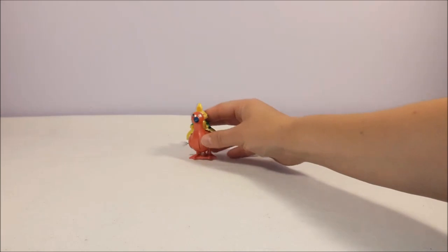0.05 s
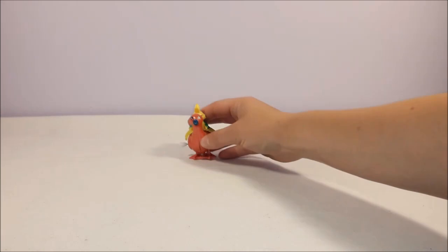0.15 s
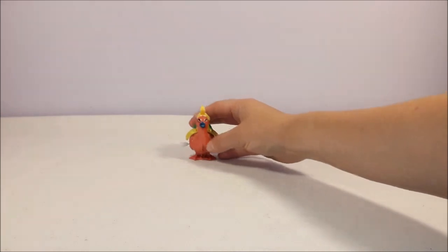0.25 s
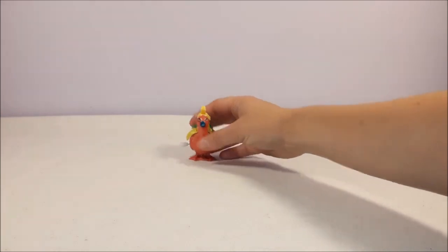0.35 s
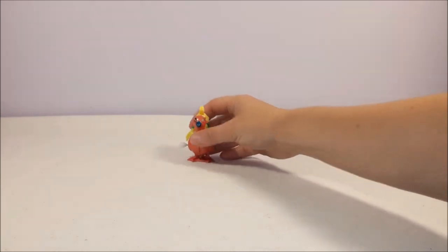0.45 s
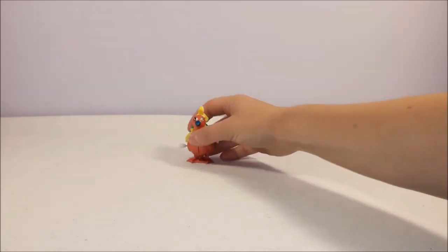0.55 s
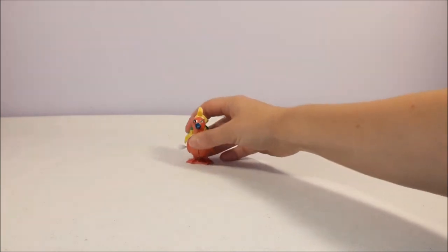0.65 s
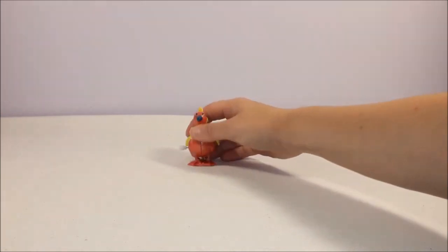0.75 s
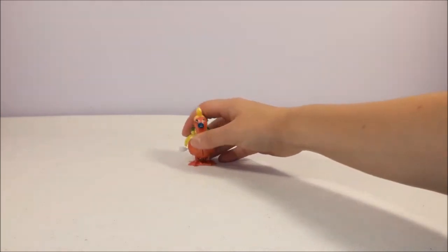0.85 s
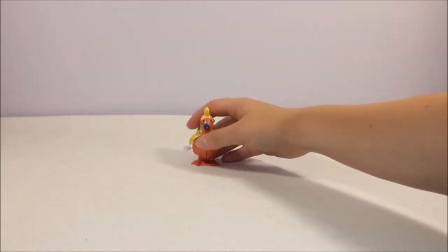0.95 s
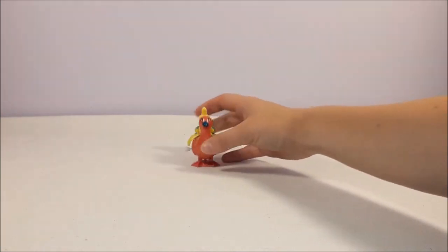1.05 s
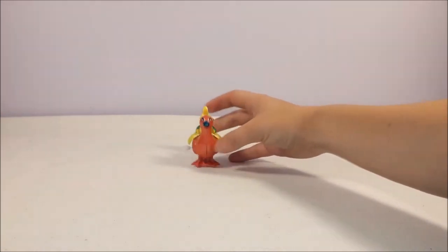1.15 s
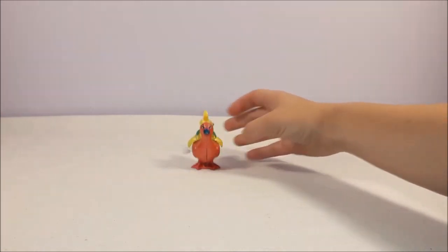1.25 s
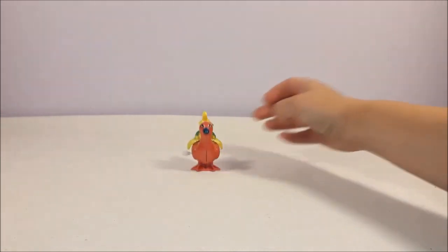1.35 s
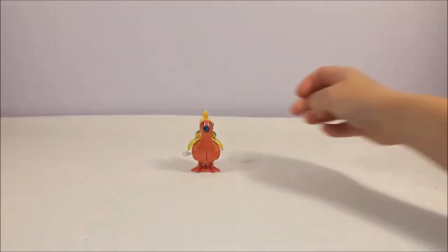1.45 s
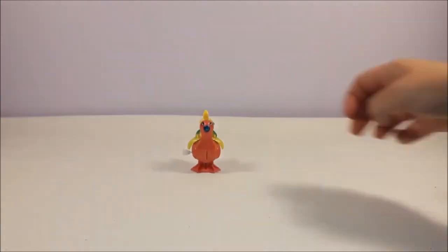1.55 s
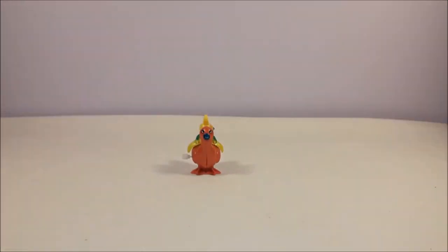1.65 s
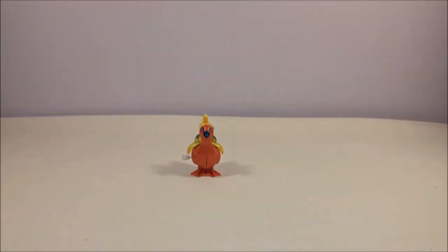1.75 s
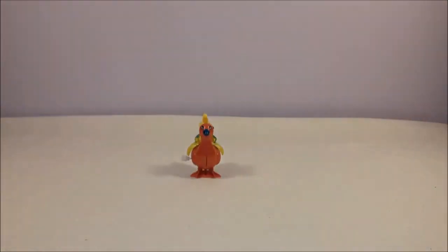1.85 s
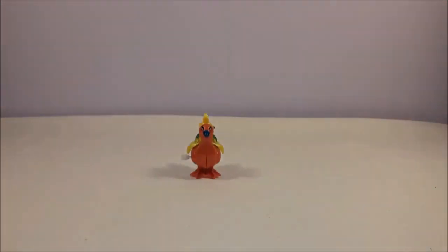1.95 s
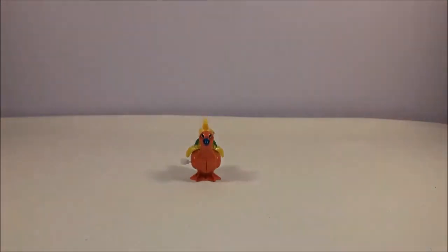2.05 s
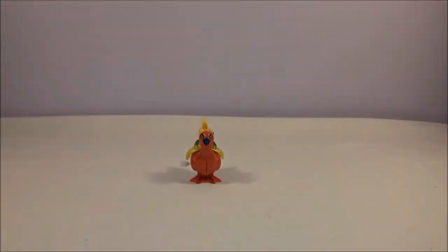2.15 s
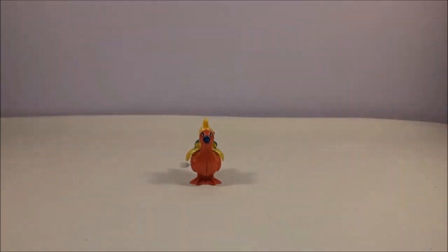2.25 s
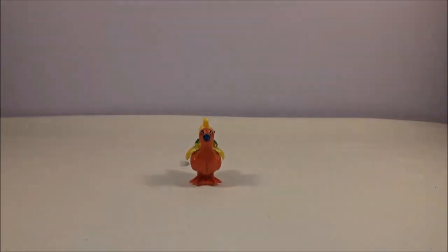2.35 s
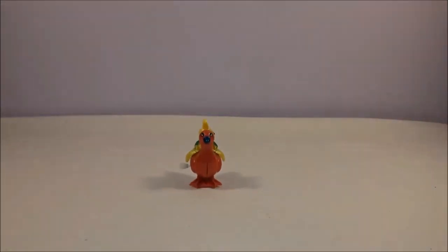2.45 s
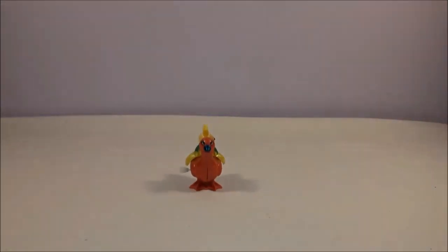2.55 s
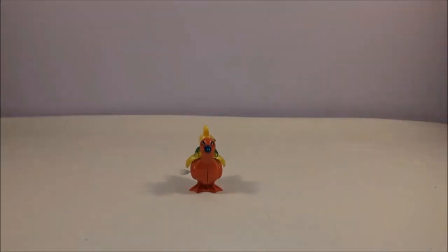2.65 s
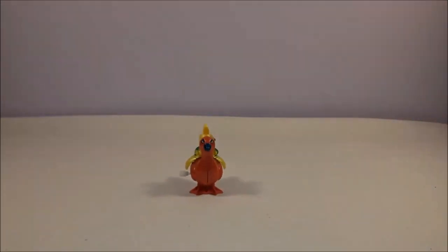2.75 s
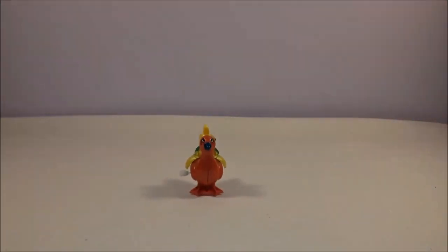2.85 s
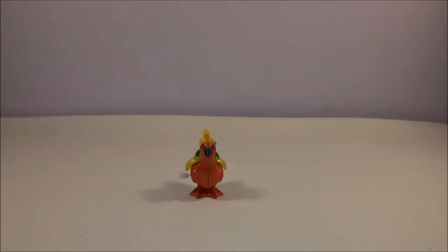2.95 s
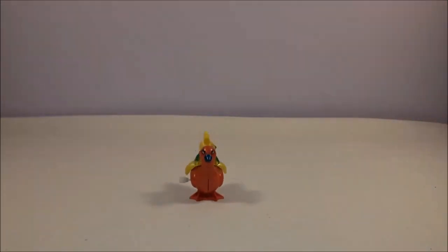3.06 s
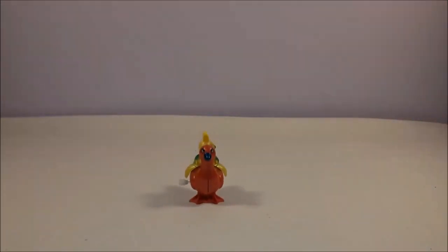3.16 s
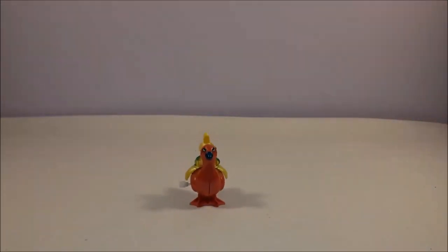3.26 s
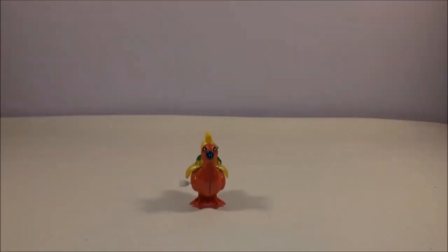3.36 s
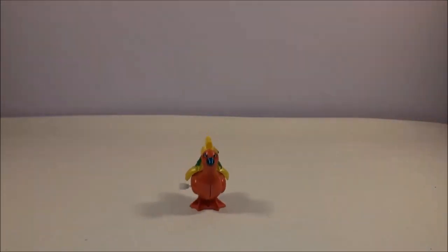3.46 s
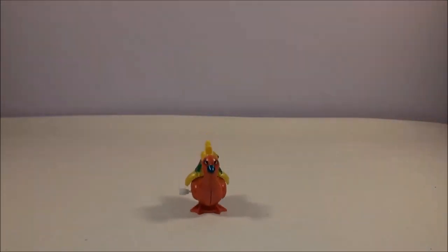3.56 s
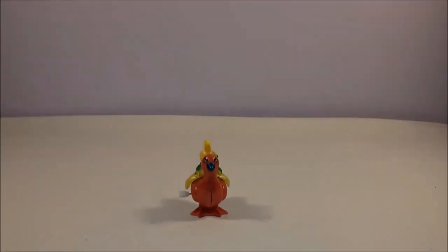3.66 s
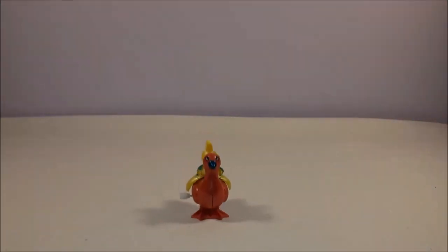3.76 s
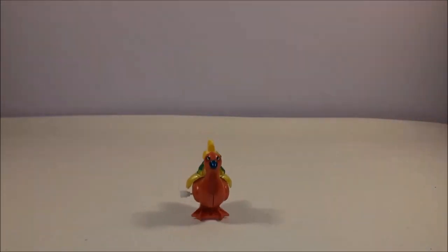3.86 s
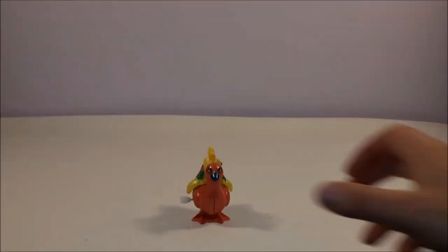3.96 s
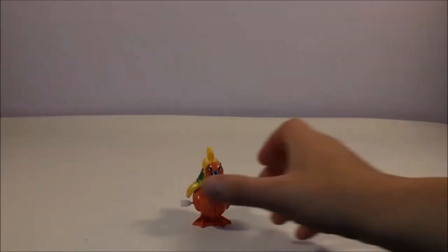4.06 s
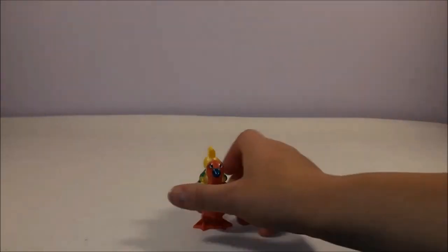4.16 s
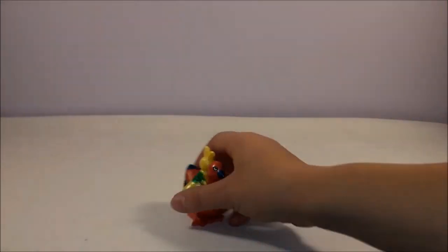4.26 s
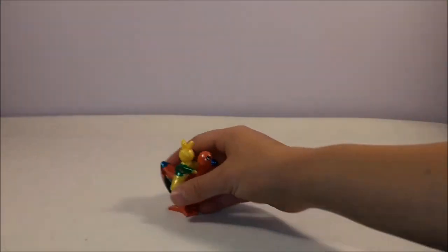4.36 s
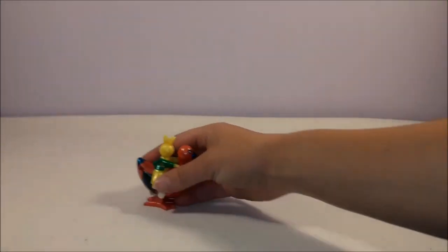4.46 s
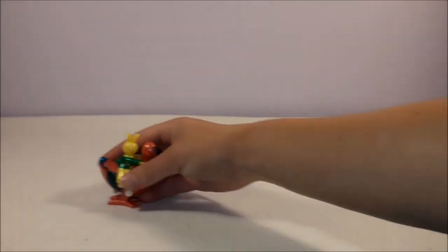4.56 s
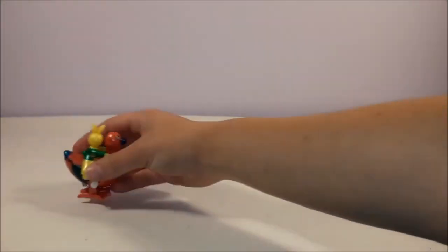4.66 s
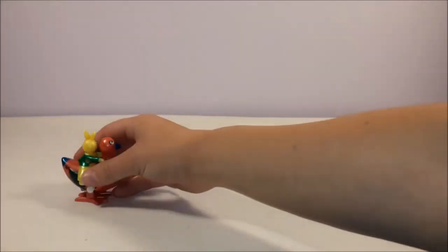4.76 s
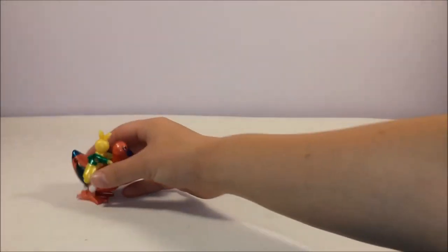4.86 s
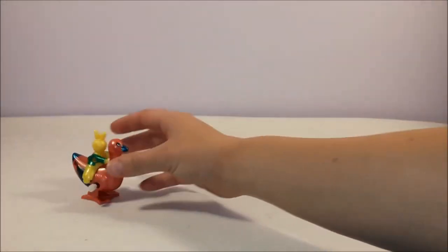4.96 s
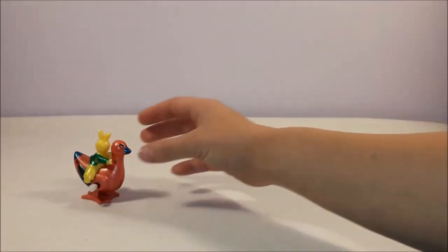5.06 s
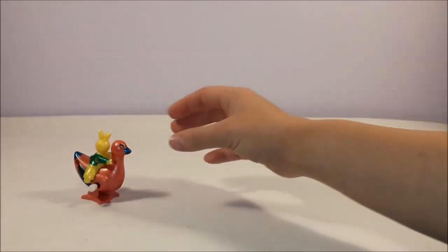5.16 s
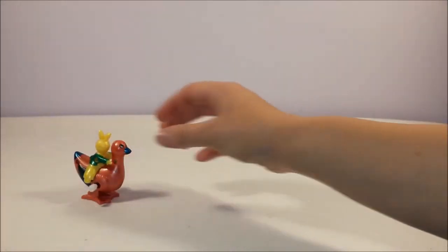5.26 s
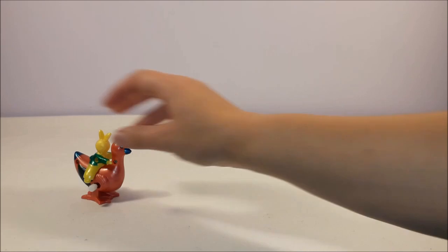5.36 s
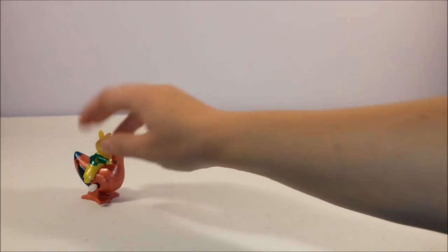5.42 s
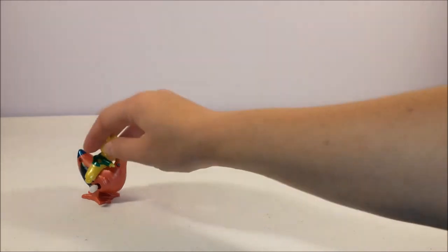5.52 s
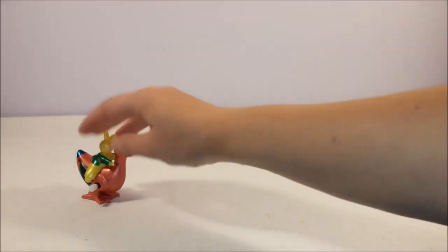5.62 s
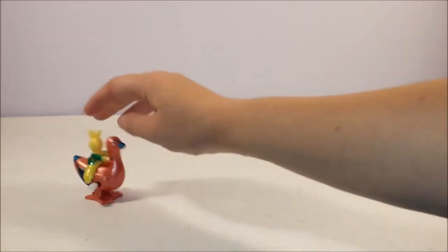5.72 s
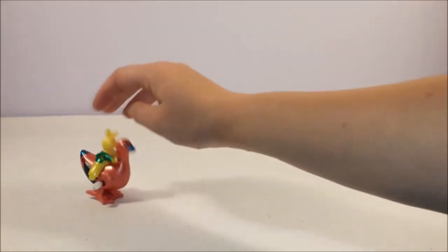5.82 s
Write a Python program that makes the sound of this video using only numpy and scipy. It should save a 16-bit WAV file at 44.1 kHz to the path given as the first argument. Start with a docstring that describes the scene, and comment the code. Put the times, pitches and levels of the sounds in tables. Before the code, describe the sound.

Fingers softly rub a small plastic wind-up toy, which is set down on a table with a sharp snap. Its gears then whir and rattle in quick even surges, about eight a second, with faint foot taps, until a hand grabs it. Clicks, knocks and brief gear bursts follow. Small room, close phone microphone, light hiss.

```python
"""Small room, a table top, a phone microphone close by: a plastic wind-up walker.
A hand fingers it (coloured grains), sets it down with a snap and lets go. The gear train rattles in one
surge per step (dense knocks ringing drifting shell modes) and the feet thud on the table (struck modes).
The hand catches it, turns it side-on, and the gears rattle on in a few short bursts.
Behind it lie microphone hiss and a low room rumble."""
import sys
import numpy as np
from scipy import signal
from scipy.fft import rfft, irfft
from scipy.io import wavfile
from scipy.ndimage import uniform_filter1d

SR = 44100
rng = np.random.default_rng(int(sys.argv[2]) if len(sys.argv) > 2 else 0)


def materialize(psi):
    """Save the field psi as 16-bit PCM at rate SR to the path in sys.argv[1].

    A 1-D psi becomes a single channel; in a 2-D psi each row is a channel.
    """
    bounded = np.clip(np.atleast_2d(psi).T, -1, 1)
    quanta = np.round(bounded * 32767).astype(np.int16)
    wavfile.write(sys.argv[1], SR, quanta)


N = 259738
TIME = np.arange(N) / SR

# Microphone hiss, spectrum shape: (f/Hz, level per Hz/dB)
HISS_COLOUR = [(88, -45), (150, -9.5), (293, -10), (356, -18.5), (409, -12), (934, -10.5), (1050, -12),
               (1230, -16), (15000, -22.5), (16500, -25)]
# Room rumble, spectrum shape: (f/Hz, level per Hz/dB)
RUMBLE_COLOUR = [(12, -42.5), (20, -18.5), (27, -14.5), (53, -2.5), (92, 0.5), (141, 1.5), (161, -8),
                 (190, -10), (352, -23), (437, -14), (500, -20.5), (650, -48), (1100, -120)]
# Room rumble over time: (t/s, level/dB)
RUMBLE_LEVEL = [(0, -76), (1.85, -78), (2.3, -75), (4.4, -74), (5.2, -78), (5.89, -74)]
# Decay of the room: (f/Hz, t60/s)
ROOM_DECAY = [(200, 0.23), (600, 0.51), (1600, 0.27), (3700, 0.26), (8000, 0.14), (13000, 0.18)]
# Microphone port: (f/Hz, gain/dB)
PORT = [(6000, -3.5), (7600, 2), (8200, -1), (8600, -7.5), (9800, -6.5), (11500, -5)]
# Modes of the table top: (f/Hz, width/Hz, level/dB)
TABLE_MODES = [(134.1, 25, -5), (231.5, 95, 3), (270, 60, -1), (455, 50, 0), (581.8, 55, 1),
               (710, 120, -3.5), (893, 450, 8), (1110, 67, -8)]
# Single thuds on the table top, handling, the set-down and a last footfall: (t/s, level/dB, hardness 0-1)
SINGLE_THUDS = [(.148, -70.5, .64), (.216, -68.5, .1), (.533, -66.5, .3), (.608, -68.5, .54),
                (.752, -35.5, .72), (.887, -61, .65), (4.238, -67, .5), (4.449, -72, .33), (4.782, -53, .4),
                (4.901, -66, .61), (4.995, -60, .6), (5.768, -66, .65)]
# Fingers rub shell and table: (start t/s, crest t/s, crest level/dB, climb/dB, 20 dB fall t/s,
# dull band relative level/dB)
RUBS = [(.06, .12, -70, 14, .08, -5), (.14, .16, -57, 14, .014, 12), (.17, .24, -67, 8, .12, 0),
        (.3, .456, -69, 6, .02, -9), (.456, .468, -56.5, 12, .2, 5), (.63, .644, -62, 10, .07, -5),
        (.68, .746, -48, 27, .004, 15), (4.334, 4.336, -51, 3, .05, 15), (4.35, 4.415, -53, 7, .22, -8),
        (4.42, 4.57, -58, 9, .055, 0), (4.71, 4.723, -75, 10, .3, -8)]
# Colour of the fine rustle, spectrum shape: (f/Hz, level per Hz/dB)
RUB_COLOUR = [(180, -53), (300, -16.5), (546, -14), (1010, -31), (1840, -9.5), (2740, -15), (3080, -10.5),
              (3950, -12), (5700, -6.5), (7080, -3), (8640, -19.5), (12500, -11.5), (16000, -11.5)]
# Loose parts tick: (t/s, peak level/dB, brightest f/Hz, sharpness Q)
LOOSE_TICKS = [(.1525, -50, 3900, 3), (.157, -45, 7400, 9), (.2468, -42.5, 7530, 12), (.368, -50, 7450, 9),
               (.401, -49, 7550, 5), (.468, -41, 7550, 6), (.4744, -43, 7530, 3), (.4905, -39, 3900, 1.6),
               (.6465, -39.5, 2180, 7), (1.0129, -45, 6240, 4), (3.2195, -22, 5070, 4.4),
               (3.8063, -17, 7800, 7), (4.2208, -18, 5400, 11), (4.2622, -25, 5300, 9),
               (4.2815, -25, 1800, 3.2), (4.33, -36, 3040, 10), (4.3744, -43, 6460, 3.6),
               (4.428, -41, 3030, 8), (4.5642, -40, 7200, 2.2), (4.7222, -58, 7150, 3.6),
               (4.7752, -26, 6750, 12), (4.953, -24, 1780, 5), (4.967, -25, 1780, 5),
               (5.049, -33, 1730, 3.2), (5.5335, -27, 6900, 5), (5.5525, -25, 7000, 4)]
# Set down on the table, and a bounce: (t/s, peak level/dB, brightest f/Hz)
SNAP = [(.7520, 0, 5300), (.7595, -7, 6500)]
# Broad colour of the shell: (f/Hz, level/dB)
SHELL_COLOUR = [(700, -50), (1150, -26.5), (1450, -14.5), (2300, -9), (4000, 0), (8200, 0.5), (11000, 3.5),
                (15500, 1.5), (20000, -10)]
# Shell modes over the broad colour: (f/Hz, width/Hz, facing level/dB, side-on level/dB)
SHELL_MODES = [(1778, 120, 15.5, 21), (1950, 120, 21.5, -39), (2613, 200, 16, 14.5), (3000, 200, 5, 12.5),
               (3600, 450, -4.5, 5.5), (4532, 220, 10.5, 1.5), (5060, 224, 12.5, 8), (5410, 240, 10, 11),
               (6400, 760, 4, 15), (7660, 300, 17, 13), (10550, 500, 1.5, -2), (11960, 800, 5.5, 7),
               (14310, 380, -8.5, 3)]
# One row a step: (tooth catch t/s, crest level/dB, shell ring level/dB, footfall level/dB)
STEPS = [(1.043, -25.5, -7, -90), (1.168, -28.5, -5, -90), (1.300, -27.8, 0, -90), (1.439, -29.5, -8, -90),
         (1.579, -28.5, -3, -90), (1.716, -29, -3, -90), (1.851, -26.5, -1, -90), (1.984, -26, -1, -90),
         (2.107, -26, 0, -80), (2.236, -24.5, -3, -80), (2.372, -25.5, -5, -64), (2.502, -26, -5, -77),
         (2.639, -25, 0, -60), (2.767, -25.5, -5, -70.5), (2.895, -25, -2, -66), (3.030, -24, 0, -61),
         (3.155, -24, 0, -63), (3.272, -23.5, -1, -66), (3.397, -23.5, -4, -63.5), (3.527, -23.5, -2, -68),
         (3.649, -24.5, -1, -68.5), (3.781, -25, -1, -60), (3.913, -23.5, -3, -62), (4.044, -23.5, 3, -80),
         (4.174, -26.5, -4, -71)]
# Cam, gear speed through a step with its crest near .45: (share of step, share of the way to the trough)
CAM = [(0, 1.1), (.08, .75), (.18, .48), (.29, .08), (.39, .15), (.48, 0), (.57, .19), (.7, .56), (.76, .6),
       (.83, .4), (.93, .85), (1, 1.1)]
# Short bursts of gear rattle, after the set-down and later in the hand:
# (start t/s, crest t/s, crest level/dB, climb/dB, 20 dB fall t/s, belly level/dB)
BURSTS = [(.756, .77, -29, 3, .085, 4), (.837, .84, -30, 4, .05, -8), (4.278, 4.28, -33.5, 6, .035, 14),
          (4.315, 4.319, -37, 10, .011, -6), (4.781, 4.787, -24.5, 6, .006, -3),
          (4.866, 4.89, -37, 10, .03, -4), (4.885, 4.911, -22.5, 17, .003, 0),
          (4.92, 4.957, -25.5, 17, .045, 2), (4.996, 5.0, -32, 8, .024, 13), (5.03, 5.052, -46, 5, .02, 8),
          (5.529, 5.542, -31, 12, .05, -26), (5.55, 5.557, -28, 5, .002, 0), (5.722, 5.747, -27, 8, .05, 3),
          (5.765, 5.776, -34, 6, .017, 12), (5.819, 5.823, -35, 6, .04, 0), (5.85, 5.886, -24, 19, .02, -6)]

HISS_DB, ROOM_DB = -75.5, -6.5
BASS_EDGE_HZ, TREBLE_EDGE_HZ = 60., 15780
FOOT_LEAD_S, FOOT_HARDNESS = .058, 0.  # the foot lands before the tooth catches
FOOT_HEARD_DB = -79  # softer footfalls stay silent

# pairs run from the first step to the last; levels are relative to 1 unless noted
CATCH_DB, CATCH_HZ, CATCH_SPREAD_DB = (-14, -2), 7700, 4.  # level against the step's crest
LEG_DB, LEG_SPREAD_DB = (-40, -33), 5.  # knock of a loose leg
LEG_HZ = (1760, 2020)  # lowest and highest knock
LEG_AFTER_S, LEG_SCATTER_S = (-.017, .028, .068), .006  # at lift, swing and drop, from the catch
GEAR_Q, SNAP_Q, SNAP_T60_S = 7., .7, .012
TICK_T60_S, TICK_SLOPE = .019, .4  # t60 at the catch pitch; lower ticks ring longer

WALK_START_S, WALK_END_S, CREST_LAG_S = 1.011, 4.275, .025  # the crest follows the catch
TROUGH_DB = (-28, -20.5)  # below the crest at full depth, start and end of the walk
BELLY_DB, BELLY_SWAY_DB = -1.5, 1.5  # lift of the lowest modes while walking, rms sway
RING_FADE_DB, HELD_RING_DB = -7., -9.  # loss of ring at full depth; ring damped by the fingers
BELLY_BELOW_HZ, LEG_MODES_BELOW_HZ, RING_BAND_HZ = 2300, 3400, (7200, 8200)


def gain_of(db):
    """Amplitude factor of a level in dB."""
    return 10 ** (np.asarray(db) / 20)


def evened(x):
    """Signal scaled to rms 1."""
    return x / np.sqrt(np.mean(x ** 2) + 1e-20)


def read(points, hz):
    """Value of a (f/Hz, value) table, straight between points over log frequency."""
    f, value = np.transpose(points)
    return np.interp(np.log(hz + 1), np.log(f + 1), value)


def coloured(x, points):
    """Causal filter with the given spectrum (minimum phase)."""
    level_db = np.maximum(read(points, abs(np.fft.fftfreq(4096, 1 / SR))), -100)
    log_gain = np.log(gain_of(level_db))
    taps = np.fft.ifft(np.exp(np.conj(signal.hilbert(log_gain)))).real[:2048]
    return signal.oaconvolve(x, taps)[:len(x)]


def resonate(x, hz, width):
    """One mode, fixed or drifting, gain 1 at its centre: shift to zero, smooth, shift back."""
    turn = np.exp(2j * np.pi * np.cumsum(hz * np.ones(len(x))) / SR)
    r = np.exp(-np.pi * width / SR)
    return 2 * (turn * signal.lfilter([1 - r], [1, -r], x * turn.conj())).real


def wander(count):
    """Slow chance, rms 1, smoothed twice over count samples."""
    return evened(uniform_filter1d(uniform_filter1d(rng.standard_normal(N), count), count))


def swell(start, crest, db, climb_db, fall):
    """Gain that sets in at once, climbs to its crest and dies away, at steady rates in dB."""
    climbing_db = climb_db * (crest - TIME) / (crest - start)
    falling_db = 20 * (TIME - crest) / fall
    return (TIME >= start) * gain_of(db - np.maximum(climbing_db, falling_db))


def contacts(per_s, spread_db, clump_db):
    """Dense random knocks of uneven size that come in clumps of a few milliseconds."""
    size = gain_of(spread_db * np.minimum(rng.exponential(1, N), 3)) * rng.standard_normal(N)
    struck = rng.random(N) < per_s / SR
    return evened(size * struck * gain_of(clump_db * wander(count=90)))


def air():
    """Microphone hiss over a low room rumble that swells and fades: noise shaped by spectrum."""
    hz = np.fft.rfftfreq(N, 1 / SR)
    hiss, rumble = (evened(irfft(rfft(rng.standard_normal(N)) * gain_of(read(colour, hz)), N))
                    for colour in (HISS_COLOUR, RUMBLE_COLOUR))
    rumble_db = np.interp(TIME, *np.transpose(RUMBLE_LEVEL))
    return gain_of(HISS_DB) * hiss + gain_of(rumble_db) * rumble


def room(x):
    """Sparse reflections, each band dying at its own speed; three tails blend into one another steadily."""
    turn, out = 2 * np.pi * 1.3 * TIME, np.zeros(N)  # 1.3 rounds a second
    for k in range(3):
        taps = np.zeros(SR // 2)
        # one reflection of random sign in every 12 samples
        taps[np.arange(200, SR // 2 - 12, 12) + rng.integers(0, 12, (SR // 2 - 201) // 12)] = 1
        taps *= rng.choice([-1., 1.], len(taps))
        hz, t, bands = signal.stft(taps, SR, nperseg=256)
        decay = gain_of(-60 * t / read(ROOM_DECAY, hz)[:, None])
        tail = signal.istft(bands * decay, SR, nperseg=256)[1]
        share = np.sqrt(2 / 3) * np.cos(turn + k * 2 * np.pi / 3)
        out += signal.fftconvolve(x * share, tail / np.linalg.norm(tail))[:N]
    return gain_of(ROOM_DB) * out


def thuds():
    """A short soft push rings the damped table top; a hard blow reaches its upper modes."""
    out, t = np.zeros(N + 9000), np.arange(9000) / SR
    footfalls = [(s - FOOT_LEAD_S, foot_db, FOOT_HARDNESS)
                 for s, crest_db, ring, foot_db in STEPS if foot_db > FOOT_HEARD_DB]
    rows = SINGLE_THUDS + footfalls
    modes = [evened(resonate(resonate(1. * (t == 0), hz, width), hz, 3 * width))
             for hz, width, db in TABLE_MODES]
    for (s, level_db, hard), noise in zip(rows, rng.standard_normal((len(rows), 9000))):
        # one firm contact in the noise, a 3.3 ms rise, 60 dB down in 0.1 s
        push = (noise + 30 * (t == t[60])) * gain_of(-60 * t / .1) * np.minimum(t / 0.0033, 1)
        tilt_db = -14 * (1 - hard)  # per octave above the lowest mode
        top = sum(gain_of(db + tilt_db * np.log2(hz / TABLE_MODES[0][0])) * mode
                  for (hz, width, db), mode in zip(TABLE_MODES, modes))
        thud = signal.fftconvolve(push, top)[:9000]
        onset_rms = np.sqrt(np.mean(thud[:1500] ** 2))
        out[round(s * SR):][:9000] += gain_of(level_db) * thud / onset_rms
    return out[:N]


def fingers():
    """Skin dragging over plastic: a fine rustle with a duller band that comes and goes."""
    grain = contacts(20000, 1., 1.5)
    fine = evened(coloured(grain, RUB_COLOUR))
    dull = 0.2 * evened(resonate(resonate(grain, 4400, 1500), 4400, 1500))
    return sum(swell(*shape) * (fine + gain_of(dull_db) * dull) for *shape, dull_db in RUBS)


def tick_rows():
    """(t/s, peak/dB, f/Hz, Q, t60/s) of all ticks; every step adds a catching tooth and leg knocks."""
    catch, crest_db, ring, foot_db = np.transpose(STEPS)
    steps = len(catch)
    catch_db = crest_db + np.linspace(*CATCH_DB, steps) + CATCH_SPREAD_DB * rng.uniform(-1, 1, steps)
    gear = [(s, db, CATCH_HZ) for s, db in zip(catch, catch_db)]
    for after in LEG_AFTER_S:
        late, loud, high = rng.uniform(-1, 1, (steps, 3)).T
        leg_db = np.linspace(*LEG_DB, steps) + LEG_SPREAD_DB * loud
        gear += zip(catch + after + LEG_SCATTER_S * late, leg_db, np.interp(high, (-1, 1), LEG_HZ))
    rows = LOOSE_TICKS + [(*row, GEAR_Q) for row in gear]
    return ([(*row, SNAP_Q, SNAP_T60_S) for row in SNAP]
            + [(s, db, hz, q, TICK_T60_S * (CATCH_HZ / hz) ** TICK_SLOPE) for s, db, hz, q in rows])


def ticks():
    """Snap, teeth, legs and loose parts: quick knocks, brightest in one region, ring the shell."""
    out, t, rows = np.zeros(N), np.arange(2500) / SR, tick_rows()
    broad = coloured(1. * (t == 0), SHELL_COLOUR)
    body = broad + sum(0.36 * resonate(broad, hz, width) for hz, width, facing, side in SHELL_MODES)
    firm = 4.7 * np.exp(-((t - .0006) / .00003) ** 2)  # one firm contact among the chatter
    for (s, db, hz, q, t60), chatter in zip(rows, rng.standard_normal((len(rows), 2500))):
        knock = (chatter + firm) * gain_of(-60 * t / t60) * np.minimum(t / .0003, 1)
        bright = signal.fftconvolve(knock, broad)[:2500]
        bright = resonate(resonate(bright, hz, hz / q), hz, 2 * hz / q)
        tick = 0.61 * evened(signal.fftconvolve(knock, body)[:2500]) + evened(bright)
        out[round(s * SR):][:2500] += gain_of(db) * tick / abs(tick).max()
    return out


def shell(belly_db, ring_db, side):
    """Gear teeth knock the hollow shell; each mode is struck from its own shifting spot. Level 1."""
    common = contacts(16000, 1.2, 1.3)
    fine = contacts(5000, 2.6, 1.6) * gain_of(6.3 * wander(count=700))
    coarse = contacts(500, 6.6, 0.72) * gain_of(3.1 * wander(count=700))  # loose legs knock the low modes
    flex = wander(count=2500)  # the rocking shell bends, and its modes drift
    out = common.copy()
    for hz, width, facing_db, side_db in SHELL_MODES:
        shift = rng.integers(SR, N - SR)  # gives each mode its own stretch of knocks and flex
        own = np.roll(coarse if hz < LEG_MODES_BELOW_HZ else fine, shift)
        db = facing_db + side * (side_db - facing_db)
        db = db + 2.5 * np.roll(flex, -shift)  # the modes flare in turn
        db = db + belly_db * (hz < BELLY_BELOW_HZ)
        db = db + ring_db * (RING_BAND_HZ[0] < hz < RING_BAND_HZ[1])
        drifting_hz = hz * (1 + 0.016 * np.roll(flex, shift))
        out += resonate(gain_of(db) * (0.8 * common + 0.56 * own), drifting_hz, width)
    out = coloured(out, SHELL_COLOUR)
    return out / np.sqrt(uniform_filter1d(out ** 2, 2048))  # running rms held at 1


def clockwork():
    """The cam loads and frees the spring once a step; short bursts of rattle come before and after the walk."""
    catch, crest_db, ring, foot_db = np.transpose(STEPS)
    marks = np.r_[WALK_START_S, catch + CREST_LAG_S, WALK_END_S]
    turns = np.r_[0, np.arange(len(catch)) + .45, len(catch)]
    depth = np.interp(np.interp(TIME, marks, turns) % 1, *np.transpose(CAM))
    trough_db = np.interp(TIME, (WALK_START_S, WALK_END_S), TROUGH_DB)
    walking = (TIME > WALK_START_S) & (TIME < WALK_END_S)
    level = walking * gain_of(np.interp(TIME, marks[1:-1], crest_db) + trough_db * depth)
    # belly lift weighted by level, so that walk and bursts blend
    belly = level * (BELLY_DB + BELLY_SWAY_DB * wander(count=2500))
    walk_ring_db = np.interp(TIME, marks[1:-1], ring) + RING_FADE_DB * depth
    ring_db = np.where(walking, walk_ring_db, HELD_RING_DB)
    for *shape, belly_db in BURSTS:
        burst = swell(*shape)
        level, belly = level + burst, belly + burst * belly_db
    side = TIME > WALK_END_S  # the hand has turned it side-on
    # gears need a moment to start and stop
    smooth = uniform_filter1d(uniform_filter1d(level, size=50), size=50)
    return smooth * shell(belly / (level + 1e-9), ring_db * ~side, side)


def scene():
    """The toy and hand with their room, through the microphone port, over the air."""
    toy = clockwork() + fingers() + ticks() + thuds()
    return (coloured(toy + room(toy), PORT) + air())[None]


def record(dry):
    """The microphone drops the deepest bass; then a steep low-pass limits the band."""
    dry = signal.sosfilt(signal.butter(1, BASS_EDGE_HZ, "high", fs=SR, output="sos"), dry)
    low_pass = signal.firwin(1023, TREBLE_EDGE_HZ, window=("kaiser", 8), fs=SR)
    return signal.oaconvolve(dry, low_pass[None], "same")


dry = scene()
out = record(dry)
materialize(out)
```